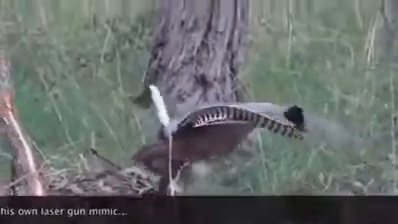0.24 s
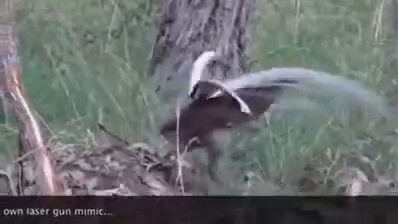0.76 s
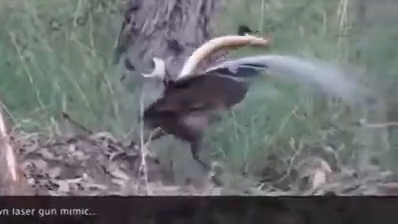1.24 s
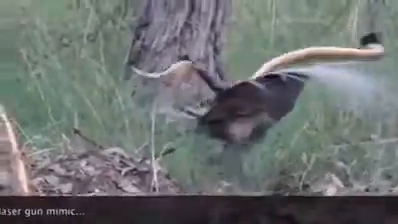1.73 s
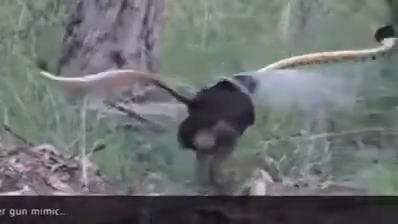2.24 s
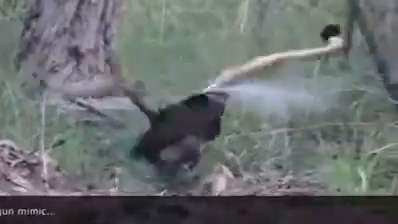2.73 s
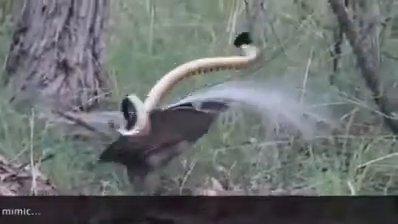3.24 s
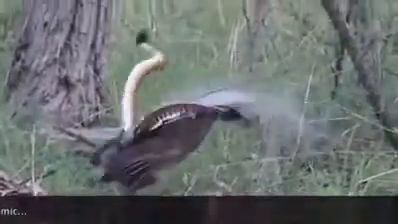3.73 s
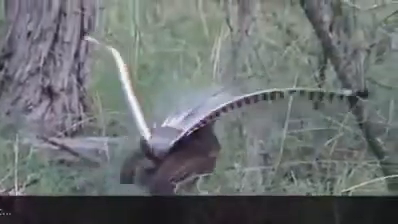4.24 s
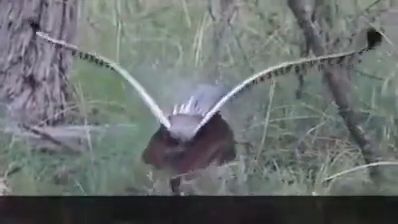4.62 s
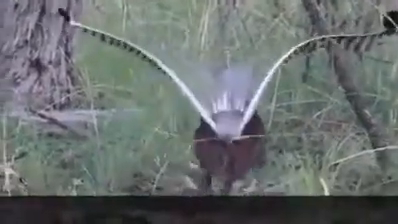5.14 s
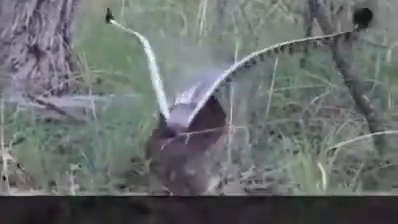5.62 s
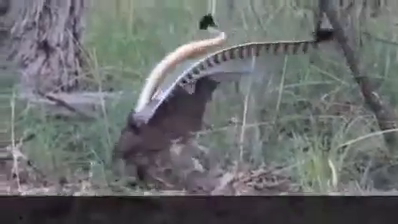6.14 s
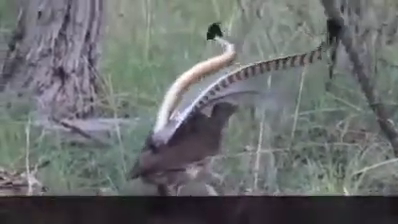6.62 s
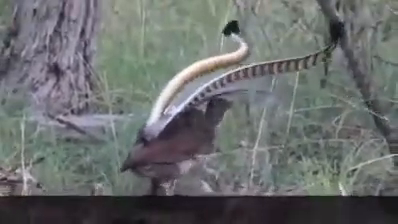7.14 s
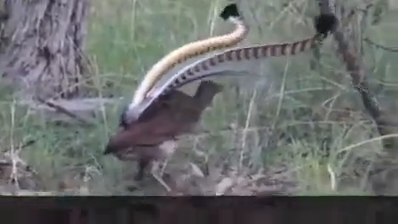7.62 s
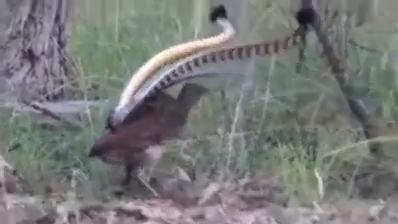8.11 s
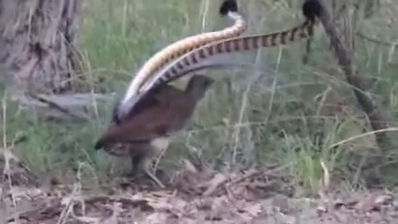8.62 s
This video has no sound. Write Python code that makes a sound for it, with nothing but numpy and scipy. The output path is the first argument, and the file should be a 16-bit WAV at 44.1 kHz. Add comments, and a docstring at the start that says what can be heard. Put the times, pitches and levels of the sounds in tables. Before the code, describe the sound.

Outdoors in a forest, a close bird scratches dry litter, then gives two loud electronic-sounding zaps, each a falling pip, a high pip and four rapid pips. Twigs snap and a distant bird whistles before two more zaps. Echoes ring among trunks and fade into smooth hiss. Later come sparse footsteps, a far whistle and brief warble, then a flurry of leaf crackles over a soft low drone.

```python
"""A lyrebird dances on leaf litter and calls four zaps, each a falling pip, a high pip and four quick pips:
gliding near-sines with husky bands and rasp, echoing among the trunks and trailed by a broad hiss.
Further off other birds whistle, warble and chirp: wavering sines and noise in gliding resonances.
Underfoot, twigs snap (noise bursts in four rings) and leaves rustle (bands of noise grains),
over a lumpy low drone of resonant noise and the shaped hiss of the forest air."""
import sys
import numpy as np
from scipy import signal
from scipy.io import wavfile
from scipy.ndimage import uniform_filter1d

SR = 44100
rng = np.random.default_rng(int(sys.argv[2]) if len(sys.argv) > 2 else 0)


def unload_audio(sound):
    """Save the sound as a 16-bit wav file, at the path given as the first command line argument."""
    columns = np.transpose(np.atleast_2d(sound))
    # keep every value between -1 and 1, then stretch to whole-number steps
    steps = np.round(np.clip(columns, -1, 1) * 32767)
    wavfile.write(sys.argv[1], SR, steps.astype(np.int16))


N = 391166  # samples, about 8.9 s


def gain_of(db):
    """Turns decibels into an amplitude factor."""
    return 10 ** (np.asarray(db) / 20)


def evened(x):
    """Scales a sound to rms 1."""
    return x / np.sqrt(np.mean(x ** 2) + 1e-20)


def read(points, hz):
    """Reads a curve of (Hz, value) points on a log-frequency axis."""
    f, value = np.transpose(points)
    return np.interp(np.log(hz + 1), np.log(f + 1), value)


def add(mix, s, sound):
    """Adds a sound into the mix at s seconds, cut off at the end of the mix."""
    part = mix[max(round(s * SR), 0):][:len(sound)]
    part += sound[:len(part)]


def resonate(x, hz, width):
    """A steep resonance: shifts the pitch hz (fixed or a curve) to zero, smooths twice, shifts back."""
    turn = np.exp(2j * np.pi * np.cumsum(hz * np.ones(len(x))) / SR)
    r = np.exp(-np.pi * abs(width) / SR)
    smoothed = signal.lfilter([(1 - r) ** 2], [1, -2 * r, r * r], x / turn + 1e-18)
    return 2 * (turn * smoothed).real


def coloured(x, colour_db, patchy_db=0):
    """Shapes short-time spectra by colour_db(Hz, s), with drifting patches of level."""
    hz, t, z = signal.stft(x, SR, nperseg=512, noverlap=384)
    patches = uniform_filter1d(rng.standard_normal(z.shape), size=6, axis=0)
    patches = evened(uniform_filter1d(patches, size=20, axis=1))
    z = z * gain_of(colour_db(hz[:, None], t) + patchy_db * patches)
    return signal.istft(z, SR, nperseg=512, noverlap=384)[1][:len(x)]


def high_passed(x, edge_hz):
    """Takes away the bass below edge_hz with a gentle second-order slope."""
    return signal.sosfilt(signal.butter(N=2, Wn=edge_hz, btype="high", fs=SR, output="sos"), x)


def air():
    """Forest air: steady noise with a shaped spectrum, thinning out in the deepest bass."""
    # Each row: frequency in Hz, relative level in dB per Hz.
    air_colour = [(12, -69), (20, -31), (75, -10), (235, -16.5), (289, -21), (492, -5.5), (668, -6.5),
                  (906, -19), (1400, -11), (1990, -30.5), (2150, -44.5), (2920, -33.5), (3570, -24),
                  (3860, -28.5), (8700, -32), (11300, -71), (19100, -120)]
    level_db = -52.5  # rms
    hiss = coloured(rng.standard_normal(N), lambda hz, t: read(air_colour, hz), patchy_db=1.0)
    return gain_of(level_db) * evened(high_passed(hiss, 50))


def drone():
    """Lumpy noise in a few low resonances, each swelling on its own; it dips briefly by each zap."""
    # Overall level. Each row: time in seconds, rms level in dB before the dips.
    drone_level = [(0.0, -50.5), (0.37, -49), (0.6, -46), (0.9, -47), (1.53, -48.5), (2.5, -47),
                   (2.7, -52.5), (4.0, -51), (4.5, -46), (4.95, -50.5), (5.58, -48), (6.619, -55.5),
                   (7.08, -45), (7.17, -52.5), (8.08, -46.5), (8.45, -45.5), (8.87, -53)]
    # Resonances. Each row: frequency in Hz, width in Hz, relative level in dB.
    modes = [(300, 70, -3), (390, 90, -1), (490, 80, 0), (610, 110, -1), (1400, 260, -13)]
    # Brief dips. Each row: centre in seconds, depth in dB, half length in seconds (to 1/e of the depth).
    dip_rows = [(1.2, -9, 0.16), (1.97, -12, 0.19), (4.12, -27.5, 0.081), (4.81, -12, 0.024)]
    hum = np.zeros(N)
    for hz, width, db in modes:
        lump = evened(uniform_filter1d(rng.standard_normal(N), size=4000))
        hum += gain_of(db + 3.57 * lump) * evened(resonate(rng.standard_normal(N), hz, width))
    t = np.arange(N) / SR
    dips = sum(depth * np.exp(-((t - at) / half) ** 2) for at, depth, half in dip_rows)
    s, db = np.transpose(drone_level)
    return gain_of(np.interp(t, s, db) + dips) * evened(hum)


def grains():
    """Dense noise grains of uneven size, about a millisecond each."""
    sizes = np.minimum(rng.exponential(1, N // 40 + 1), 4)
    return rng.standard_normal(N) * gain_of(2.3 * np.repeat(sizes, 40)[:N])


def rustle():
    """Leafy hiss: a thin patchy bed of grains that swells and fades."""
    # Each row: time in seconds, level in dB (of grains evened to rms 1 over the whole scene).
    rustle_level = [(0.0, -41), (0.288, -56.5), (0.9, -61), (2.6, -66.5), (3.16, -65.5), (3.56, -51),
                    (3.95, -60.5), (5.5, -64.5), (6.15, -54), (6.94, -64), (7.88, -60), (8.35, -54.5),
                    (8.87, -55)]
    # Sound of the litter. Each row: frequency in Hz, relative level in dB per Hz.
    litter = [(410, -42.5), (700, -14.5), (1970, -7), (2530, -6), (3130, -8.5), (3370, -10), (3630, -10),
              (5030, -13), (8700, -31.5), (11300, -68.5), (19100, -120)]
    leaves = coloured(grains(), lambda hz, t: read(litter, hz), patchy_db=3.0)
    s, db = np.transpose(rustle_level)
    return gain_of(np.interp(np.arange(N) / SR, s, db)) * evened(leaves)


def swishes():
    """Feet sweeping leaves: each sweep is a band of grains that starts quickly and thins out."""
    # Each row: start in seconds, length in seconds, starting rms level in dB, lowest Hz, highest Hz.
    sweeps = [(0, .036, -51, 920, 5100), (0.066, 0.091, -43, 1500, 6000), (0.191, 0.084, -40, 940, 6100),
              (0.27, 0.074, -50.5, 3450, 5500), (2.698, 0.092, -48, 1500, 6000),
              (2.746, 0.17, -48, 3400, 6200), (3.102, 0.029, -48.5, 3450, 6400),
              (3.136, 0.085, -51.5, 1500, 7750), (3.213, 0.1, -49.5, 3400, 6400),
              (3.353, 0.046, -51, 3500, 6550), (3.533, .03, -45, 1000, 6500), (3.573, 0.12, -45, 980, 5600),
              (5.504, 0.077, -55, 2500, 6960), (5.57, 0.19, -49, 1000, 6330), (6.03, .2, -52.5, 1500, 6000),
              (6.4, 0.061, -53, 1500, 5500), (8.152, 0.16, -52.5, 2000, 6040),
              (8.332, 0.182, -42, 1000, 2600), (8.35, 0.16, -48, 3220, 5250),
              (8.578, 0.086, -51, 1000, 5760), (8.772, 0.09, -47.5, 980, 5130)]
    out, leaves = np.zeros(N), grains()
    for s, length, db, low_hz, high_hz in sweeps:
        band = signal.butter(N=5, Wn=[low_hz, high_hz], btype="band", fs=SR, output="sos")
        stretch = leaves[round(s * SR):][:round(length * SR)]
        sweep = evened(signal.sosfilt(band, stretch))
        thinning_db = np.linspace(0, 3.0, len(sweep))
        add(out, s, gain_of(db - thinning_db) * sweep * signal.windows.tukey(len(sweep), .25))
    return out


def snaps():
    """Snapping twigs and leaves: dying crumbs of noise through four broad rings of the twig."""
    # Each row: start in seconds, peak level in dB, brightness in octaves above 1 kHz,
    # level change in dB per octave away from that brightness, time in seconds to die by 60 dB.
    snap_rows = [(0.072, -19, 1.35, -16, .01), (0.475, -33.5, 2.1, -6, 0.083), (2.663, -27.5, -1, 2, 0.015),
                 (2.708, -19, 1.5, -8.5, 0.031), (2.763, -29, 4, -2.5, .03), (2.802, -30.5, 3, -1, .045),
                 (2.848, -35, 1.1, -14, 0.09), (3.097, -29, -1, 3, 0.023), (3.144, -23, 1.47, -15, 0.031),
                 (3.227, -32.5, 2, -4, .04), (3.265, -26.5, 1.8, -8, 0.035), (3.308, -32, -3.5, 2, 0.029),
                 (3.588, -29.5, 1.5, -5, 0.13), (5.514, -31, 1.7, -3, 0.036), (5.556, -24, 1.5, -30, 0.053),
                 (5.614, -34, 1, -3, 0.043), (5.701, -37, 0.7, -14, 0.039), (5.965, -33.5, 1, -6, .034),
                 (6.014, -29, 1.5, -11.5, .058), (6.123, -30.5, 5, -1, .033), (6.408, -35.5, 1.1, -9, .025),
                 (6.636, -15, -1.07, -11, 0.023), (6.644, -29.5, 3, -7, 0.029), (7.09, -34, -0.5, -3, 0.05),
                 (8.024, -27.5, 1, 3, .018), (8.116, -28, -1, -9, .02), (8.212, -31.5, 2.5, -13, 0.031),
                 (8.274, -30.5, 1.6, -7, .03), (8.342, -32, 0.4, -14, 0.024), (8.351, -33, -1.6, -15, .04),
                 (8.371, -27, 0.5, -20, .015), (8.39, -26, 1.5, -16, 0.03), (8.411, -28, 1.1, -12, 0.028),
                 (8.427, -23.5, 0.94, -37, 0.017), (8.445, -29.5, 1.3, -35, 0.061),
                 (8.484, -38, 0.2, -20, 0.025), (8.521, -31, 1.5, -12, 0.029),
                 (8.59, -21, 1.5, -28.5, 0.025), (8.776, -19, 1.24, -20.5, 0.04)]
    # The four rings. Each row: frequency in Hz, width in Hz, relative level in dB.
    twig_rings = [(950, 1100, 1.4), (1903, 1700, 1.3), (4545, 1300, -0.2), (7480, 850, -16.5)]
    rise_ms = 1.1
    out, t = np.zeros(N), np.arange(3000) / SR
    rise = np.minimum(1000 * t / rise_ms, 1) ** 2
    for s, peak_db, bright, slope_db, t60 in snap_rows:
        crumbs = rng.standard_normal(len(t)) * gain_of(-60 * t / max(t60, 1 / 500)) * rise
        crack = np.zeros(len(t))
        for hz, width, db in twig_rings:
            octaves_away = abs(np.log2(hz / 1000) - bright)
            crack += gain_of(db + slope_db * octaves_away) * evened(resonate(crumbs, hz, width))
        crack = high_passed(crack, 450)
        add(out, s, gain_of(peak_db) * crack / abs(crack).max())
    return out


def whistle_curve(s, length, top_hz, db, dip_db):
    """Rows (s, Hz, dB) of a whistle that scoops up, starts soft, bends in level late and droops at the end."""
    scoop_hz, scoop_s = 597.4, .05
    droop_hz, droop_s = 153, .03
    swell_s, soft_db = .075, -16.5
    t = np.linspace(0, length, num=40)
    hz = top_hz - scoop_hz * np.exp(-t / scoop_s) - droop_hz * np.exp((t - length) / droop_s)
    soft_start = soft_db * np.maximum(1 - t / swell_s, 0)
    late_dip = dip_db * np.exp(-((t / length - .72) / .15) ** 2)
    return np.transpose([s + t, hz, db + soft_start + late_dip])


def whistle(rows, octave_db, throb=0.):
    """A sine that wavers a little, with a husky near-octave; throb beats the level 62 times a second."""
    s, *columns = np.transpose(rows)
    t = np.arange(s[0], s[-1], 1 / SR)
    hz, db = (np.interp(t, s, c) for c in columns)
    hz = hz * (1 + .007 * evened(uniform_filter1d(rng.standard_normal(len(t)), size=300)))
    husky = evened(resonate(rng.standard_normal(len(t)), 2.08 * hz, 220))
    tone = np.sqrt(2) * np.sin(2 * np.pi * np.cumsum(hz) / SR)  # rms 1
    tone *= 1 + throb * np.sin(2 * np.pi * 62 * t)
    sound = gain_of(db) * (tone + gain_of(octave_db) * husky)
    return s[0], sound * signal.windows.tukey(len(t), .08)


def far_birds():
    """Birds further off: whistles, a throbbing warble, and brief notes of noise in a gliding resonance."""
    # Whistles. Each row: start in seconds, length in seconds, pitch in Hz that the scoop climbs towards,
    # rms level in dB before the soft start and dip, late change of level in dB (a dip if negative).
    whistle_rows = [(0.138, 0.24, 3210, -40, -14), (1.775, .22, 3190, -43.5, -6.5),
                    (3.345, 0.22, 3293, -44.5, -10), (6.88, .22, 3297, -47.5, 3)]
    # One warbling note. Each row: time in seconds, pitch in Hz, rms level in dB before the throb.
    warble_curve = [(7.14, 4120, -60.5), (7.148, 3900, -48), (7.17, 3590, -39), (7.248, 3575, -36),
                    (7.256, 3560, -44), (7.3, 3570, -59)]
    # Brief notes. Each row: start in seconds, length in seconds, first Hz, last Hz,
    # rms level in dB before the fades, width in Hz.
    chirps = [(.168, .032, 950, 2300, -44, 90), (.15, .016, 3100, 3900, -49, 120),
              (.156, .044, 4300, 5700, -51, 120), (.235, .145, 8050, 7900, -64, 150),
              (.53, .05, 7300, 7300, -59, 1200), (1.455, .03, 7600, 7600, -55, 1200),
              (1.69, .05, 7300, 7300, -59, 1200), (2.06, .04, 7500, 7500, -57, 1200),
              (3.31, .055, 7400, 7600, -56, 1000), (4.6, .1, 7500, 7500, -59, 1200),
              (7.105, .07, 4900, 4750, -53, 500), (7.14, .025, 4050, 3900, -50, 400),
              (7.15, .25, 8300, 8300, -70, 400), (7.82, .025, 6800, 7000, -62, 1200)]
    out = np.zeros(N)
    for row in whistle_rows:
        add(out, *whistle(whistle_curve(*row), octave_db=-14.5))
    add(out, *whistle(warble_curve, octave_db=-38.5, throb=0.41))
    for s, length, first_hz, last_hz, db, width in chirps:
        n = round(length * SR)
        note = resonate(rng.standard_normal(n), np.linspace(first_hz, last_hz, n), width)
        add(out, s, gain_of(db) * evened(note) * signal.windows.tukey(n, .25))
    return out


def wash():
    """Broad smooth hiss that wells up from each zap and dies away slowly."""
    # Each row: start in seconds, rms level in dB that the dying hiss is counted down from.
    wells = [(1.1, -43), (1.9, -41), (4.06, -46), (4.799, -46.5)]
    # Each row: frequency in Hz, relative level in dB per Hz.
    wash_colour = [(700, -29.5), (1800, -3), (2600, -7), (3500, -9.5), (3900, -9), (5600, -10.5),
                   (6200, -22.5), (7800, -19.5), (9000, -35.5)]
    rise_s, t60_s = 0.13, 3.57
    power = np.zeros(N)
    for s, db in wells:
        age = np.maximum(np.arange(N) / SR - s, 0)
        power += (gain_of(db - 60 * age / t60_s) * np.minimum(age / rise_s, 1)) ** 2
    hiss = coloured(rng.standard_normal(N), lambda hz, t: read(wash_colour, hz), patchy_db=0.5)
    return np.sqrt(power) * evened(hiss)


def zaps():
    """Each pip is a short gliding near-sine with a faint octave and husky bands, and a puff of rasp."""
    # Six pips a zap. Each row: peak time in seconds, peak level in dB of the sine, pitch in Hz at the peak,
    # length in ms between the points 8 dB down.
    pips = [(1.05, -12.5, 1636, 15), (1.0838, -3.5, 2930, 7), (1.1084, -2.4, 2126, 4.3),
            (1.128, -4.6, 2073, 5), (1.145, -8.3, 2035, 5.3), (1.1634, -6.3, 2131, 4.9),
            (1.8475, -6.7, 1590, 15.5), (1.8767, -4.5, 3080, 7), (1.9006, -0.8, 2229, 4.4),
            (1.9216, -5.8, 2155, 4.4), (1.9387, -6.9, 2053, 3.7), (1.9543, -9.6, 1911, 4.4),
            (4.0046, -14.8, 1635, 15.5), (4.038, -7.5, 3000, 10), (4.0576, -0.3, 2132, 5),
            (4.0796, -6.9, 2041, 4.6), (4.0971, -5.1, 2066, 4.6), (4.1131, -6.8, 2029, 3.2),
            (4.7339, -14.4, 1643, 15.5), (4.7666, -4.8, 3050, 6), (4.7889, -2.3, 2156, 4.9),
            (4.8093, -5.1, 2137, 4), (4.8265, -6.3, 2053, 3.7), (4.843, -7.2, 2055, 3.9)]
    # One row for each place in the zap: kind of pip (row of voices), glide in Hz per ms at the peak,
    # share of the length that rises.
    shapes = [(0, -23, .57), (1, 52, .27), (2, -35, .36), (2, 10, .6), (2, -40, .52), (2, -55, .52)]
    # One row for each kind (falling, high, quick): octave in dB and rasp in dB against the sine,
    # husky throat bands as (Hz, width in Hz, dB against the sine); facing changes rasp and bands.
    voices = [(-34, -43, [(5300, 180, -42), (8040, 93, -36.5)]), (-39.5, -28, [(5000, 190, -40.5),
              (6480, 1200, -35), (7630, 320, -38)]), (-41.5, -57.5, [(5200, 1100, -35.5),
              (6800, 920, -44)])]
    # The bird turns between zaps. Each row: time in seconds, echo in dB, change of huskiness in dB.
    facings = [(1.1, -8.5, -1), (1.901, -11, 0.5), (4.05, -8, 1), (4.8, -6, -2.5)]
    # Rasp. Each row: frequency in Hz, relative level in dB per Hz.
    breathy = [(900, -34), (2500, 13.5), (4000, 19), (5500, 3), (6300, -11), (7500, -3.5), (9000, -16)]
    tone, puffs = np.zeros(N), np.zeros(N)
    ms = np.arange(-25, 25, 1000 / SR)  # time around the peak
    turn_s, echo_db, husky_db = np.transpose(facings)
    for (s, db, hz, length), (kind, glide, rising) in zip(pips, shapes * len(facings)):
        rise, fall = rising * length, (1 - rising) * length
        shape = gain_of(db - 8 * abs(ms / np.where(ms < 0, rise, fall)) ** 2.2)
        bend = np.where(ms < 0, 2 * rise, .8 * fall)  # the glide levels off away from the peak
        pitch = hz + glide * bend * np.tanh(ms / bend)
        phase = 2 * np.pi * (np.cumsum(pitch) / SR + rng.random())
        octave_db, rasp_db, bands = voices[kind]
        breath = rng.standard_normal(len(ms))
        facing = gain_of(np.interp(s, turn_s, husky_db))
        husky = facing * sum(gain_of(d) * evened(resonate(breath, f, width)) for f, width, d in bands)
        start = s - 25 / 1000
        add(tone, start, shape * (np.sin(phase) + gain_of(octave_db) * np.sin(2 * phase) + husky))
        add(puffs, start, facing * gain_of(rasp_db) * shape)
    rasp = puffs * evened(coloured(rng.standard_normal(N), lambda hz, t: read(breathy, hz)))
    thrown = gain_of(np.interp(np.arange(N) / SR, turn_s, echo_db))  # how much goes out to the trunks
    return tone, rasp, thrown


def forest(x):
    """Sparse echoes of random sign and size, stronger from clumps of trunks, each band dying at its own speed."""
    # The clearing sends little back at first, then clumps of trunks answer.
    # Each row: delay in seconds, spread in seconds, extra level in dB.
    clumps = [(0, .03, -4), (.15, .03, 1.5), (.3, .04, 2)]
    # What the trunks throw back. Each row: frequency in Hz, relative level in dB.
    bark = [(1000, -8), (1600, -5), (1850, 1), (2200, 0), (3100, -6), (5000, 0), (8000, 0)]
    # Ringing among the trunks. Each row: frequency in Hz, time in seconds to die by 60 dB.
    ring = [(1000, 0.98), (1600, 1.78), (2100, 1.506), (3100, 1.19), (5000, 0.73), (8000, 1.51)]
    taps, t = np.zeros(2 * SR), np.arange(2 * SR) / SR
    at = np.arange(130, 2 * SR - 40, 40)  # one echo in every 40 samples
    sizes = gain_of(3.5 * np.minimum(rng.exponential(1, len(at)), 3))
    taps[at + rng.integers(0, 40, len(at))] = rng.choice([-1., 1.], len(at)) * sizes
    taps *= gain_of(sum(db * np.exp(-((t - delay) / spread) ** 2) for delay, spread, db in clumps))
    tail = coloured(taps, lambda hz, t: read(bark, hz) - 60 * t / read(ring, hz))
    tail *= t > 130 / SR  # silent for the first 3 ms
    return signal.fftconvolve(x, tail / np.linalg.norm(tail))[:N]


def scene():
    """The rasp of the zaps arrives mostly as echo; the ground noises are dry or nearly so."""
    # Echoes off the nearest trunks. Each row: delay in seconds, level in dB against the direct zap.
    near_trunks = [(.0056, -17), (.011, -20), (.0165, -19)]
    slap_s, slap_db, slap_hz, slap_width_hz = .133, -8.5, 2100, 910  # a clear echo off a bank some 23 m away
    calls, rasp, thrown = zaps()
    far, ground = far_birds(), snaps()
    sent = thrown * (calls + gain_of(15.5) * rasp) + gain_of(1.5) * far + gain_of(-15.0) * ground
    wet = forest(sent)
    slap = resonate(thrown * calls, slap_hz, slap_width_hz)
    add(wet, slap_s, gain_of(slap_db) * slap[:-round(slap_s * SR)])
    for delay, db in near_trunks:
        add(wet, delay, gain_of(db) * (calls + rasp))
    background = rustle() + wash() + air() + drone()
    return (calls + rasp + far + ground + wet + swishes() + background)[None]


def record(dry):
    """A soft ceiling just under full scale, then a steep treble limit."""
    edge_hz = 8720
    held = dry / (1 + abs(dry) ** 16) ** (1 / 16)
    low_pass = signal.firwin(511, edge_hz, window=("kaiser", 9), fs=SR)
    return signal.oaconvolve(held, low_pass[None], "same")


dry = scene()
out = record(dry)
unload_audio(out)
```